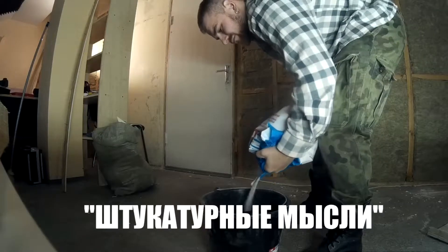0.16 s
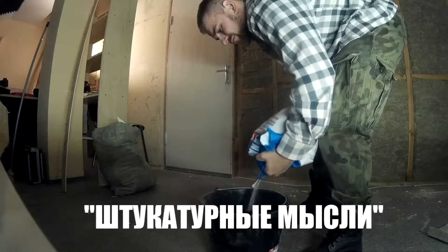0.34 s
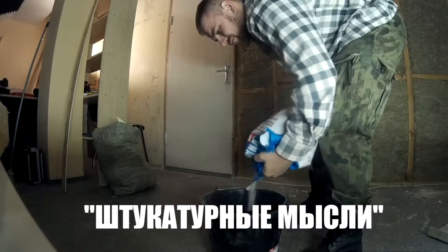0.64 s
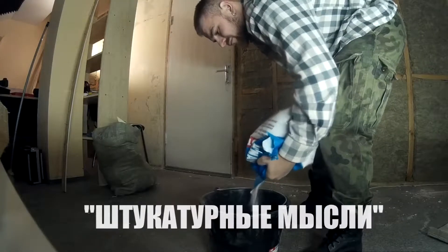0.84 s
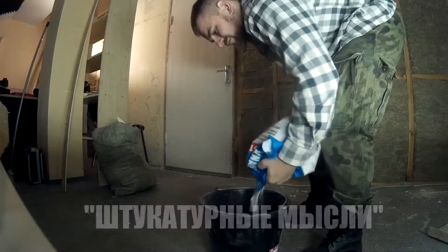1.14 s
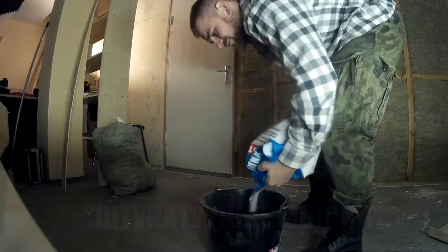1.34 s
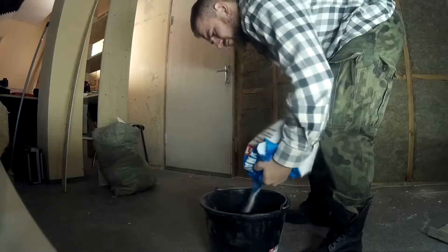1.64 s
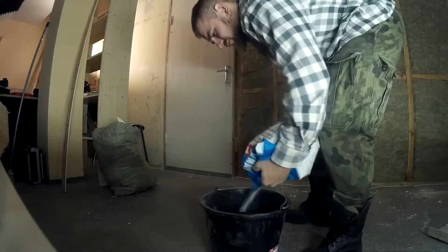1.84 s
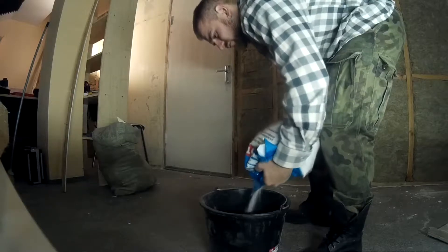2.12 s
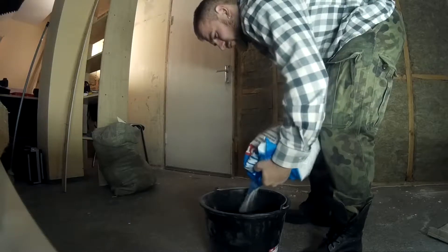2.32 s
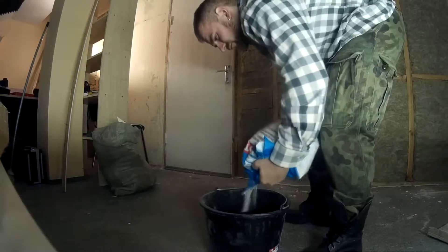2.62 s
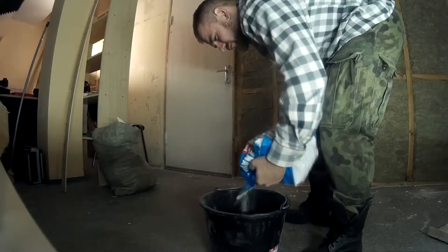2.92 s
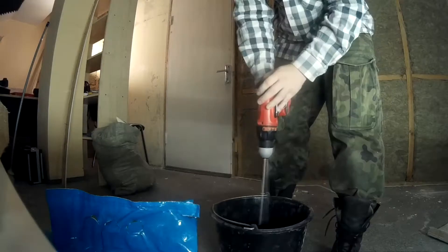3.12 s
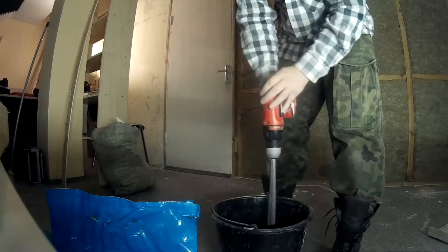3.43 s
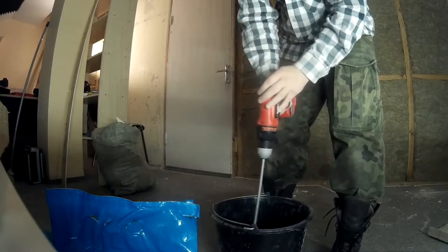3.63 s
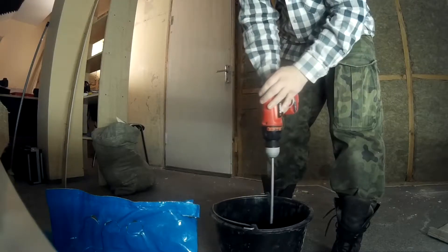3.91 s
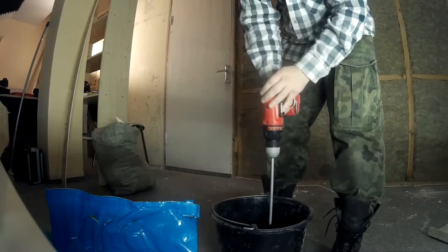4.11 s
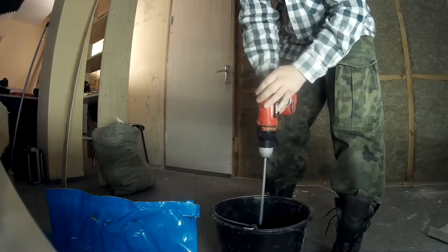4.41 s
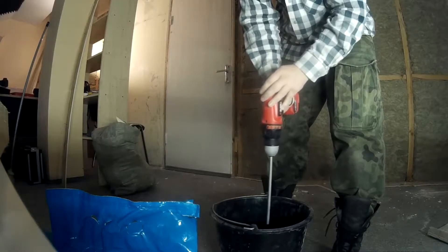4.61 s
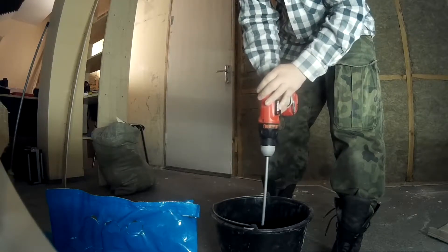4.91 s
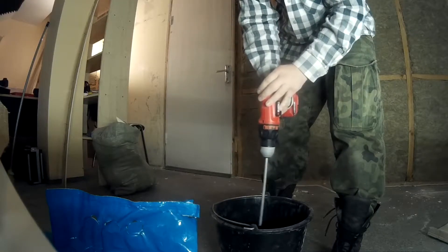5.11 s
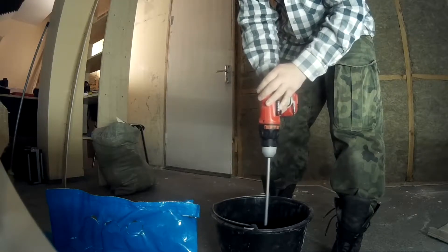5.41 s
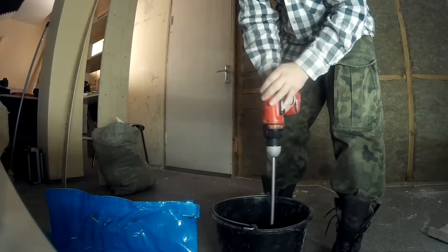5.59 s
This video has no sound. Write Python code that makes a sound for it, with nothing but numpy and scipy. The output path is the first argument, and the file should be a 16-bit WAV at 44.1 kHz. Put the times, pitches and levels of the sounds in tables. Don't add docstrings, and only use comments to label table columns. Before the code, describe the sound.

In a quiet small room, powder trickles into a plastic bucket of water with a faint dull patter and soft lump plops. At three seconds a drill abruptly starts, gears clattering upward in pitch, then runs steadily with rattle, hiss and hum. Its paddle rubs, sings and knocks on the bucket wall, hardest after four and a half seconds. Close, mono microphone with faint hiss.

```python
import sys
import numpy as np
from scipy import signal
from scipy.fft import rfft, irfft
from scipy.io import wavfile

SR = 44100
rng = np.random.default_rng(int(sys.argv[2]) if len(sys.argv) > 2 else 0)


def gain_from_decibels(decibels):
    exponent = np.asarray(decibels, float) / 20
    return 10 ** exponent


def to_wav(s):
    ch = np.atleast_2d(s).T
    pcm = np.round(np.clip(ch, -1, 1) * 32767)
    wavfile.write(sys.argv[1], SR, pcm.astype(np.int16))


N = 253575
TIME = np.arange(N) / SR


def rms_one(x):
    return x / np.sqrt(np.mean(x ** 2) + 1e-20)


def in_time(rows):
    s, *columns = np.transpose(rows)
    return [np.interp(TIME, s, column) for column in columns]


def while_on(start_s, end_s, fade_s=0.018):
    return np.clip(np.minimum(TIME - start_s, end_s - TIME) / fade_s, 0, 1)


def drift(rate):
    every = 40
    r = np.exp(-2 * every * np.pi * rate / SR)
    noise = rng.standard_normal(N // every + 2002)
    slow = signal.lfilter([1], [1, -2 * r, r * r], noise)[2000:]
    return np.interp(np.arange(N) / every, np.arange(len(slow)), rms_one(slow))


def coloured(x, spectrum):
    hz, level_db = np.transpose(spectrum)
    bins_hz = np.maximum(np.fft.rfftfreq(N, 1 / SR), 1)
    gain_db = np.interp(np.log(bins_hz), np.log(hz), level_db)
    return rms_one(irfft(rfft(x) * gain_from_decibels(gain_db), N))


def resonance(x, hz, width_hz):
    r = np.exp(-np.pi * width_hz / SR)
    zeros = [(1 - r * r) / 2, 0, (r * r - 1) / 2]
    return signal.lfilter(zeros, [1, -2 * r * np.cos(2 * np.pi * hz / SR), r * r], x)


def butter(x, order, hz, kind="low"):
    return signal.sosfilt(signal.butter(order, hz, kind, fs=SR, output="sos"), x)


def ring(clicks, hz, t60_s):
    r, w = gain_from_decibels(-60 / (t60_s * SR)), 2 * np.pi * hz / SR
    return signal.lfilter([0, np.sin(w)], [1, -2 * r * np.cos(w), r * r], clicks + 1e-18)


def grains(per_s, spread_db):
    sizes = gain_from_decibels(spread_db * np.minimum(rng.exponential(1, N), 4)) * rng.choice([-1, 1], N)
    return rms_one(sizes * (rng.random(N) < per_s / SR))


def note(hz, wobble_db, wander):
    turns = np.cumsum(hz * (1 + wander * drift(26)[:len(hz)])) / SR
    tone = np.sin(2 * np.pi * (turns + rng.random()))
    return np.sqrt(2) * tone * gain_from_decibels(wobble_db * drift(45)[:len(hz)])


# pitch_hz, level_db_per_hz
AIR = [(15, -37), (25, -6), (322, -1.5), (469, -7.5), (741, -7.5), (1450, -14), (10300, -17), (13900, -21),
       (15500, -28)]
AIR_DB = -63


def air():
    return gain_from_decibels(AIR_DB) * coloured(rng.standard_normal(N), AIR)


# time_s, patter_db
STREAM = [
    (0, -56),
    (.2, -63),
    (.27, -73),
    (.9, -80),
    (.98, -67),
    (1.5, -69.5),
    (2.3, -68),
    (2.6, -57),
    (3.0, -66.5),
]
# start_s, peak_db, centre_hz, bright_part_db (against peak)
PLOPS = [(0.436, -49, 940, -25), (0.455, -55, 774, -15), (0.609, -57, 958, -14), (0.742, -56, 864, -18),
         (0.779, -50, 930, -1.5), (0.803, -45.5, 930, -7), (0.955, -60.5, 760, 0), (0.989, -59, 834, -9),
         (1.225, -66, 794, -10), (1.304, -48.5, 1190, -0.5), (1.577, -48.5, 859, -18),
         (1.816, -62, 525, -6), (1.859, -57, 883, -11), (1.981, -53.5, 660, -14), (2.085, -55.5, 675, -9),
         (2.196, -49, 796, -24), (2.223, -51, 1060, -21), (2.3, -54.5, 507, -14), (2.322, -51, 860, -10),
         (2.352, -48.5, 950, 0), (2.419, -51.5, 570, -15), (2.454, -50.5, 680, -9), (2.547, -49, 830, -13),
         (2.577, -35, 785, -4), (2.647, -49, 786, -25), (2.729, -47.5, 846, -19), (2.785, -52, 780, -1),
         (2.865, -54.5, 720, -2), (2.911, -51.5, 670, -7), (2.983, -40.5, 990, -18)]
HOLLOW_DB, HOLLOW_FOLLOWS = -73.5, 0.96
SPLASH_S, SPLASH_RISE_S = 0.016, 0.0041
CONTACT, CONTACT_PER_DB = 0.5, 0.021


def powder():
    patter_db, = in_time(STREAM)
    hollow_db = HOLLOW_DB + HOLLOW_FOLLOWS * (patter_db + 70.5)
    fall = grains(3000, 3.0) * gain_from_decibels(2.0 * drift(10))
    hollow = gain_from_decibels(hollow_db - 2.5) * rms_one(resonance(resonance(fall, 315, 170), 354, 410))
    patter = gain_from_decibels(patter_db - 15.5) * rms_one(resonance(resonance(fall, 620, 670), 740, 1160))
    out = (hollow + patter) * while_on(-1, 3.7)
    length = 8000
    after_s = np.arange(length) / SR
    envelope = np.exp(-after_s / SPLASH_S) * np.clip(after_s / SPLASH_RISE_S, 0, 1)
    for start_s, peak_db, hz, bright_db in PLOPS:
        spray = rng.standard_normal(length) * rng.exponential(1, length) ** 0.75 * envelope
        spray[0] = -40 * max(CONTACT + CONTACT_PER_DB * (peak_db + 49), 0) ** 2
        dull = resonance(resonance(spray, hz, 0.59 * hz), 0.73 * hz, 0.93 * hz)
        bright = resonance(resonance(spray, 1650, 1100), 1900, 1800)
        bright += 0.05 * resonance(spray, 3800, 1800)
        splash = dull / np.abs(dull).max() - gain_from_decibels(bright_db) * bright / np.abs(bright).max()
        at = round(start_s * SR)
        out[at:at + length] += gain_from_decibels(peak_db) * splash
    return out


ROOM_T60_S, ROOM_DB, ROOM_FROM_HZ = 0.29, -10.5, 450


def room(x):
    after_s = np.arange(int(0.4 * SR)) / SR
    tail = rng.standard_normal(len(after_s)) * gain_from_decibels(-60 * after_s / ROOM_T60_S) * (after_s > 0.006)
    tail = butter(signal.lfilter([1], [1, -0.6], tail), 1, ROOM_FROM_HZ, "high")
    return gain_from_decibels(ROOM_DB) * signal.fftconvolve(x, tail / np.sqrt(np.sum(tail ** 2)))[:N]


# time_s, rattle_db
LOAD = [(2.99, -56), (3.11, -41.5), (3.33, -41), (3.58, -37.5), (3.78, -40), (3.9, -37), (4.03, -40.5),
        (4.2, -34.5), (4.7, -35.5), (5.1, -36), (5.27, -35.5), (5.4, -35.5), (5.6, -36.5), (5.75, -34.5)]
# peak_s, over_load_db
SURGES = [(3.191, 5), (3.3, 2.5), (3.468, 5), (3.69, 4.5), (3.97, 5), (4.09, 4), (4.26, 2), (4.442, 3),
          (4.6, 2.5), (5.14, 1.5), (5.49, 1.5)]
SURGE_RISE_S, SURGE_FALL_S = 0.06, 0.024


def load():
    load_db, = in_time(LOAD)
    for peak_s, db in SURGES:
        width_s = np.where(TIME < peak_s, SURGE_RISE_S, SURGE_FALL_S)
        load_db = load_db + db * np.exp(-((TIME - peak_s) / width_s) ** 2)
    return load_db


# pitch_hz, width_hz, level_db (rms)
FAN = [(3654, 1150, -0.5), (4283, 690, 1), (5420, 1100, -10.5), (6940, 390, -19.5), (7470, 520, -9.5),
       (9540, 1700, -19), (10730, 690, -8), (12070, 1300, -9)]
# time_s, level_db
FACING = [(3.1, -1.5), (3.25, 2), (3.45, -0.5), (3.7, -1.5), (3.9, -1.5), (4.1, 1), (4.3, -0.5), (4.45, 2),
          (4.6, 1), (4.75, 1), (4.9, 0), (5.0, -0.5), (5.1, 0.5), (5.3, 0), (5.5, 0), (5.75, 0.5)]
HISS_DB, HISS_FOLLOWS, HISS_DB_PER_HZ = -48, 0.75, 0.1535
HISS_TOP_DB = -12.5
FAN_RUN_UP_S = 0.15


def fan():
    hiss_db = HISS_DB + HISS_FOLLOWS * (load() + 36)
    hiss_db += HISS_DB_PER_HZ * (in_time(SPEED)[0] - 248) + in_time(FACING)[0]
    breath = grains(7000, 2.5) * gain_from_decibels(1.1 * drift(12) + 1.2 * drift(80))
    out = 0
    for k, (hz, width_hz, db) in enumerate(FAN):
        band = rms_one(resonance(resonance(breath, hz, width_hz), hz, 2.33 * width_hz)) * (-1) ** k
        out += gain_from_decibels(db + (HISS_TOP_DB + 10) * (hz > 6000) + 0.17 * drift(19)) * band
    return gain_from_decibels(hiss_db - 4.5) * out * while_on(3.005, 9, FAN_RUN_UP_S) ** 1.1


# time_s, centre_hz, level_db
MESH = [
    (3.015, 850, -60),
    (3.05, 930, -46),
    (3.1, 1002, -42),
    (3.14, 1117, -40),
    (3.175, 1297, -36),
    (3.195, 1329, -32.5),
    (3.22, 1230, -36),
    (3.26, 1200, -58),
]
MESH_WIDTH_HZ, MESH_HITS_PER_S, MESH_SECOND_DB = 150, 400, -10.5


def run_up():
    hz, level_db = in_time(MESH)
    hits = grains(MESH_HITS_PER_S, 3.4) + 1j * grains(MESH_HITS_PER_S, 2.5)
    slack = butter(hits, 2, MESH_WIDTH_HZ)
    mesh = np.exp(2j * np.pi * np.cumsum(hz) / SR)
    band = np.real(slack * mesh + gain_from_decibels(MESH_SECOND_DB) * slack[::-1] * mesh ** 2)
    return gain_from_decibels(level_db) * rms_one(band) * while_on(3.01, 3.27)


JOLT_S, JOLT_FROM_DB = 0.017, -28.5


def jolt():
    out = 0
    for start_s, peak_db, *_ in KNOCKS:
        after = np.clip(TIME - start_s, 0, None) / JOLT_S
        out = out + max(peak_db - JOLT_FROM_DB, 0) * after * np.exp(1 - after)
    return out


# pitch_hz, level_db_per_hz
GEARS = [(35, -58), (60, -36), (198, -22.5), (245, -17.5), (302, -13.5), (400, -17), (702, -8.5),
         (767, 2.5), (1440, -14), (1750, -1), (2920, -11), (4000, -20.5), (5200, -22), (8800, -120)]
# pitch_hz, width_hz, level_db
HOUSING = [(475, 23, 1), (701, 91, 3.5), (835, 70, -6.5), (924, 84, 4), (991, 140, 0.5), (1123, 38, 5),
           (1181, 40, 3), (1263, 114, 7.5), (1490, 163, 4), (1681, 56, 4.5), (1770, 27, -3), (1885, 93, 0),
           (2120, 120, -8.5), (2290, 49, 1.5), (2617, 17, -5.5)]
RATTLE_JOLT, BODY_JOLT = 0.15, 0.31
BODY_DB, BODY_START_DB, RUN_UP_S = 1, 9, 0.08
WAKING_DB, SPLIT_HZ = 1.8, 1300


def gearbox():
    shake_db = jolt()
    rattle_db = load() + RATTLE_JOLT * shake_db
    start_db = BODY_START_DB * np.exp(-np.abs(TIME - LOAD[0][0]) / RUN_UP_S)
    body_db = BODY_DB + BODY_JOLT * shake_db + start_db
    teeth = coloured(grains(2500, 1.54), GEARS) * gain_from_decibels(1.16 * drift(2.7))
    low = high = 0
    for k, (hz, width_hz, level_db) in enumerate(HOUSING):
        mode = gain_from_decibels(level_db + WAKING_DB * drift(5)) * resonance(teeth, hz, width_hz) * (-1) ** k
        if hz < SPLIT_HZ:
            low = low + mode
        else:
            high = high + mode
    dull_teeth = butter(teeth, 2, SPLIT_HZ)
    body = rms_one(low + 0.65 * dull_teeth)
    rattle = rms_one(high + 0.5 * (teeth - dull_teeth))
    return gain_from_decibels(rattle_db + 0.5) * (rattle + gain_from_decibels(body_db + 0.5) * body) * while_on(3.012, 9, 0.012)


# time_s, pitch_hz, level_db
SING = [
    (4.13, 776, -57),
    (4.165, 786, -23),
    (4.21, 770.4, -48),
    (4.25, 774.6, -26),
    (4.33, 785, -29.5),
    (4.37, 788, -38.5),
    (4.41, 773.5, -24),
    (4.505, 784.6, -26),
    (4.525, 785, -52),
]
# start_s, length_s, first_hz, last_hz, level_db
GLIDES = [
    (3.015, .085, 745, 725, -47),
    (3.03, .11, 900, 870, -46),
    (3.13, .11, 235, 255, -53),
    (3.08, .115, 950, 1160, -41),
    (3.12, .1, 1240, 1430, -40),
    (4.52, .06, 800, 930, -34),
    (4.572, .035, 960, 750, -30),
    (5.33, .07, 1150, 1110, -30),
    (4.7, .3, 1015, 1050, -43),
]
# start_s, length_s, pitch_hz, level_db
RUBS = [(3.015, .06, 347, -54), (3.19, .045, 577, -42), (3.25, 0.087, 848, -47), (3.37, .14, 848, -42.5),
        (3.35, .07, 700, -47), (3.1, .05, 680, -44), (3.25, 0.31, 470, -51.5), (3.42, 0.081, 1750, -43),
        (3.82, 0.1, 585, -47), (3.98, 0.15, 689, -42.5), (4.18, 0.055, 852, -35), (4.21, 0.086, 620, -43),
        (4.2, 0.094, 1610, -39), (4.6, .1, 910, -32), (4.59, 0.033, 1145, -31), (4.76, 0.37, 838, -43.5),
        (5.015, 0.044, 1122, -31.5), (5.39, 0.21, 1093, -35), (5.34, 0.079, 952, -34),
        (5.33, .08, 335, -38.5), (5.36, 0.19, 1630, -41.5), (5.58, .06, 1730, -40), (3.44, .04, 310, -48),
        (3.935, .045, 315, -40), (3.43, .06, 1200, -42), (3.1, 0.067, 900, -41), (4.03, 0.057, 760, -41),
        (4.42, 0.046, 1320, -35), (4.43, 0.034, 1720, -35.5), (5.46, 0.12, 1165, -39),
        (5.66, .09, 900, -42), (5.56, 0.17, 1300, -45), (3.66, 0.052, 1620, -42), (5.28, .02, 1180, -27),
        (4.95, .08, 1290, -43)]


def rubbing():
    sing_hz, sing_db = in_time(SING)
    out = gain_from_decibels(sing_db) * note(sing_hz, wobble_db=1.1, wander=0.002) * while_on(4.12, 4.58)
    steady = [(start_s, length_s, hz, hz, db) for start_s, length_s, hz, db in RUBS]
    for start_s, length_s, first_hz, last_hz, db in list(GLIDES) + steady:
        along = np.linspace(0, 1, round(length_s * SR))
        swell = np.sin(np.pi * along).clip(0) ** 0.52
        tone = note(first_hz + (last_hz - first_hz) * along, wobble_db=3.2, wander=0.009)
        at = round(start_s * SR)
        out[at:at + len(along)] += gain_from_decibels(db + 0.3) * swell * tone
    return out


SLOSH_DB, SLOSH_HZ = -60.5, 135
SLOSH_DB_PER_HZ, FREE_HZ = 1.5, 248.3


def slosh():
    drag_db = -SLOSH_DB_PER_HZ * np.clip(in_time(SPEED)[0] - FREE_HZ, 0, None)
    thuds = resonance(resonance(grains(130, 3.0), SLOSH_HZ, 87), SLOSH_HZ, 130)
    return gain_from_decibels(SLOSH_DB + drag_db + 4.7 * drift(4.3)) * rms_one(thuds) * while_on(3.08, 9, 0.11)


# start_s, peak_db, deep_db, upper_db, high_db (wall modes against peak)
KNOCKS = [(3.12, -41.5, -9, -11, -3), (3.195, -44, -17, 17.5, 0), (3.239, -41, -19, 5, 0),
          (3.312, -43, -26, -15, 0), (3.379, -38, -6, -6, -6), (3.45, -36, -12, -10, 2),
          (3.55, -49, -4, -4, 0), (3.647, -40, -13, 2.5, 0), (3.818, -40, -4, 2, -5),
          (3.941, -33, -15, -20, 2), (4.017, -37.5, -14, 4, 0), (4.062, -33, -15, -4, -2),
          (4.09, -34.5, -8, -7, 0), (4.165, -27, -15, -1, -4), (4.26, -27.5, -13, -5, -4),
          (4.297, -44.5, -11, 7, 0), (4.328, -38, -23, -7, 0), (4.408, -26, -15, -6, -10),
          (4.43, -25, -28, -4, 5), (4.516, -27.5, -12, -2.5, -1), (4.574, -28, -13, 4, 2),
          (4.6, -14, -23, -11, 0), (4.635, -35, -7, 1, 7), (5.088, -24.5, -6.5, 4.5, -3),
          (5.143, -15.5, -19.5, -3, 0.5), (5.179, -31, -10, -2, 0), (5.21, -35, -10, 0, 0),
          (5.284, -12.5, -18.5, -4, 1.5), (5.305, -27.5, -25, 3.5, 0), (5.349, -35.5, -14, -8, 2)]
# pitch_hz, level_db, t60_s
BUCKET_LOW = [(127, -6.5, 0.064), (149, 2, .12), (186.5, -3, 0.066)]
BUCKET = [(237.6, -6.5, .06), (274, -8, 0.048), (314.8, -3, 0.068), (372, 1.2, 0.081), (430, -5, 0.052)]
BUCKET_UPPER = [(492, -3, .05), (559.3, 4.5, 0.082), (629, -2.5, .06)]
BUCKET_HIGH = [(795, -7, .05), (945, -4, .06), (1150, 0, .05), (1310, -8, .05), (1480, -6, .05),
               (1700, -8, .05), (1880, -9, .04), (2230, -14, .04)]
CHATTER_S, BOUNCES_PER_S = 0.018, 900
NOTE_HZ, NOTE_PER_DB = 372, 0.15


def knocks():
    length = 3000
    out, after_s = np.zeros(N), np.arange(length) / SR
    at = [round(row[0] * SR) for row in KNOCKS]
    _, peak_db, deep_db, upper_db, high_db = np.transpose(KNOCKS)
    shape = (len(at), length)
    bounces = rng.standard_normal(shape) * (rng.random(shape) < BOUNCES_PER_S / SR)
    bounces *= 0.35 / (1 + (after_s / CHATTER_S) ** 6)
    bounces /= np.sqrt(np.sum(bounces ** 2, axis=1, keepdims=True))
    hit = after_s == 0
    groups = [(BUCKET_LOW, deep_db + 5.5), (BUCKET, -1),
              (BUCKET_UPPER, upper_db - 4.5), (BUCKET_HIGH, high_db - 11.0)]
    for modes, share_db in groups:
        for hz, level_db, t60_s in modes:
            woken_db = NOTE_PER_DB * (peak_db - peak_db.max()) * (abs(hz / NOTE_HZ - 1) < 0.07)
            chance_db = rng.normal(0, 1.54, len(at))
            gains = gain_from_decibels(peak_db + share_db + level_db + woken_db + chance_db)
            clicks = np.zeros(N)
            for i, gain, train in zip(at, gains, bounces):
                clicks[i:i + length] += gain * (hit + train * min(hz / 1000, 1.2))
            out += resonance(ring(clicks, hz, t60_s), hz, max(0.22, hz / 2200) * hz)
    out = butter(out, 4, 108, "high")
    return butter(out, 2, 2400)


# time_s, third_order_db
ROTOR = [(3.3, -70), (3.42, -40), (3.48, -65), (3.53, -40.5), (3.7, -35), (3.79, -49), (3.84, -35),
         (4.02, -43), (4.12, -35), (4.2, -37), (4.26, -32.5), (4.35, -47), (4.5, -34.5), (4.66, -51),
         (4.76, -41), (5.04, -36), (5.22, -41), (5.75, -36)]
# time_s, turns_hz
SPEED = [(3.3, 234), (3.54, 243), (3.9, 248), (4.1, 246.5), (4.3, 249), (4.5, 248.5), (4.74, 257),
         (4.92, 259.7), (5.25, 257.3), (5.5, 259.6), (5.75, 259.8)]
# multiple, level_db (against first order)
EVEN_ORDERS = [(2, -8), (4, 2), (26, -25), (28, -22)]
FIRST_DB, FIRST_DB_PER_HZ, FIRST_FOLLOWS = -51, 0.27, 0.28


def rotor():
    third_db, = in_time(ROTOR)
    speed_hz, = in_time(SPEED)
    first_db = FIRST_DB + FIRST_DB_PER_HZ * (speed_hz - 248) + FIRST_FOLLOWS * (third_db + 39.5)
    turns = np.cumsum(speed_hz * (1 + 0.001 * drift(15))) / SR
    orders = [(1, first_db), (3, third_db + 1.2 * drift(20))]
    orders += [(k, first_db + db + 2.0 * drift(6)) for k, db in EVEN_ORDERS]
    hum = sum(gain_from_decibels(db) * np.sin(2 * np.pi * (k * turns + rng.random())) for k, db in orders)
    return np.sqrt(2) * hum * while_on(3.28, 9, 0.068)


def scene():
    blows = powder() + knocks()
    drill = fan() + run_up() + gearbox() + rotor()
    return (air() + blows + room(blows) + drill + rubbing() + slosh())[None]


def roll_off(x):
    return signal.sosfilt(signal.butter(12, 15630, fs=SR, output="sos"), x)


def record(dry):
    return roll_off(dry)


dry = scene()
out = record(dry)
to_wav(out)
```